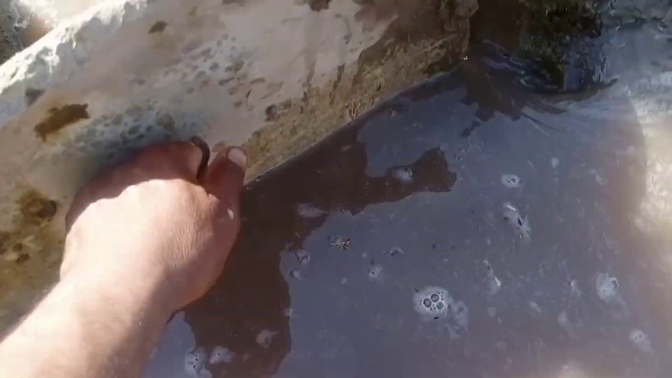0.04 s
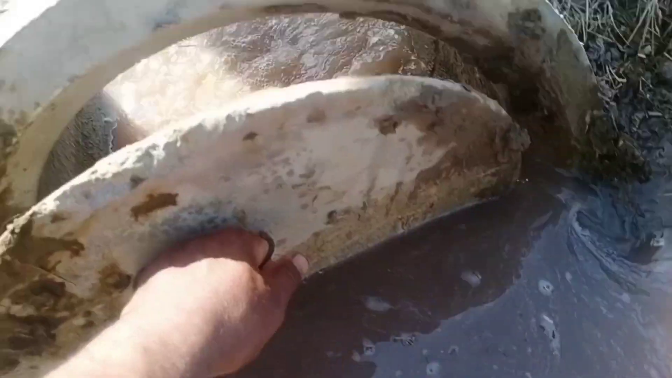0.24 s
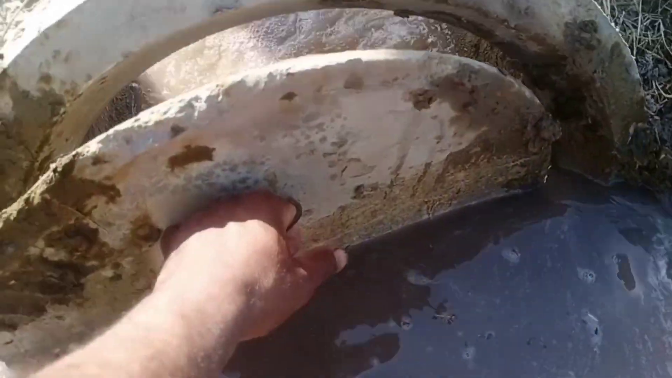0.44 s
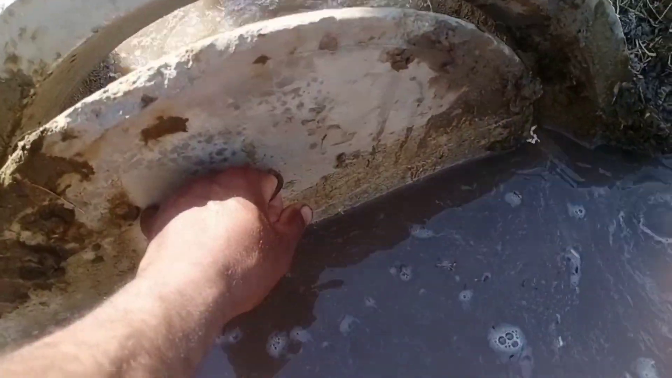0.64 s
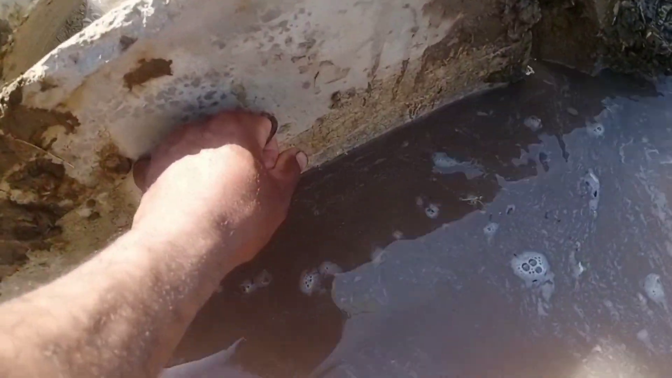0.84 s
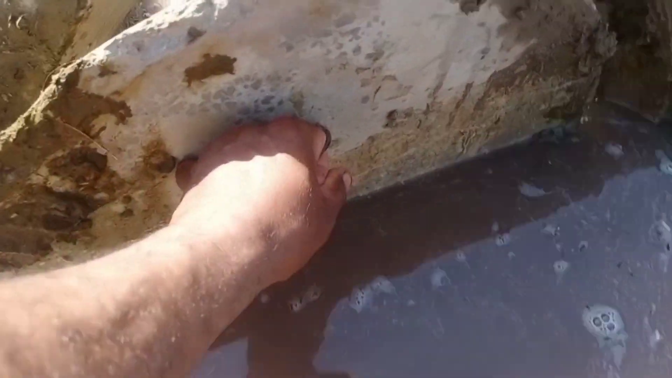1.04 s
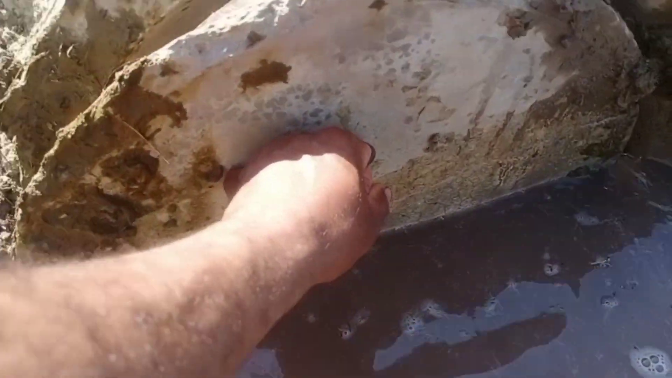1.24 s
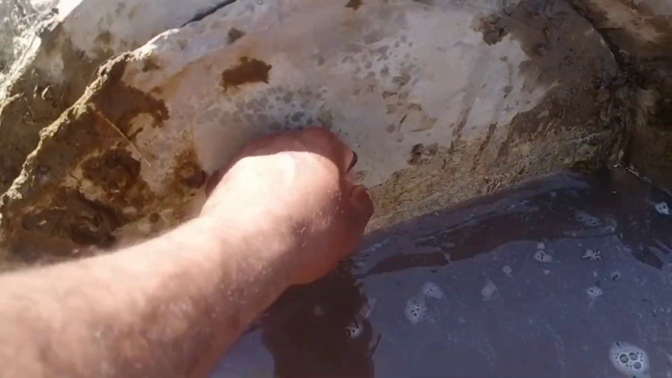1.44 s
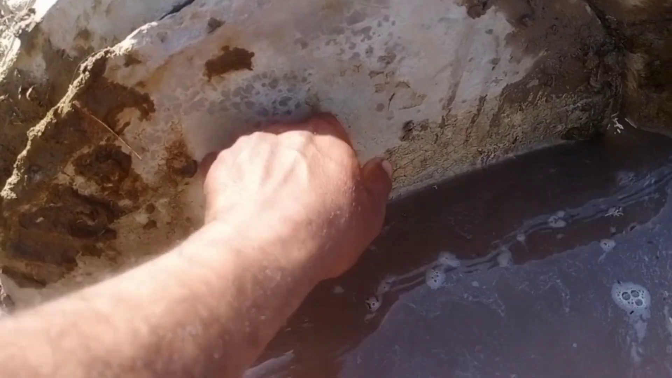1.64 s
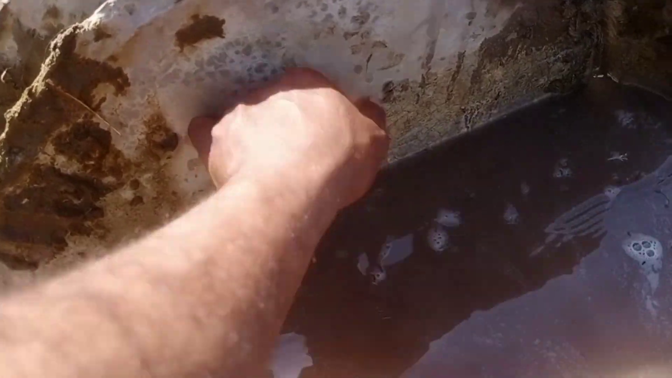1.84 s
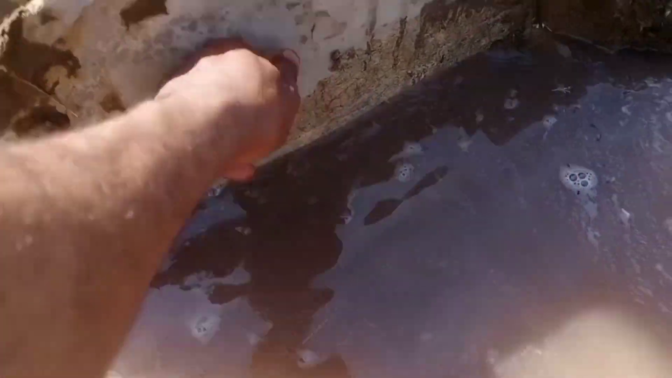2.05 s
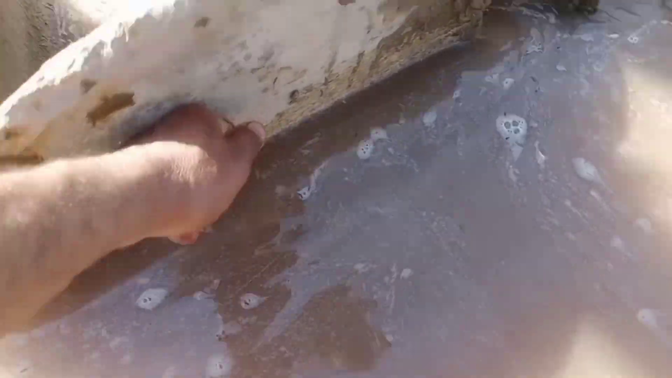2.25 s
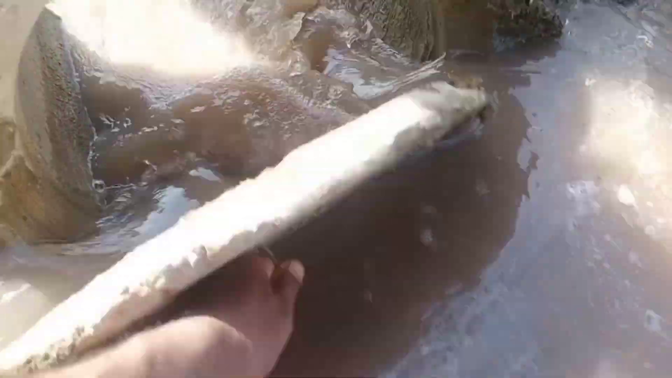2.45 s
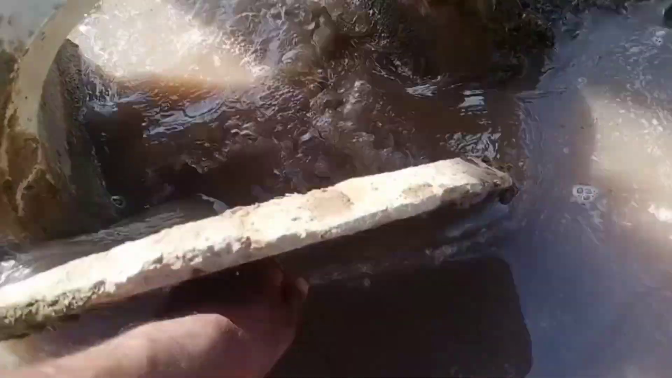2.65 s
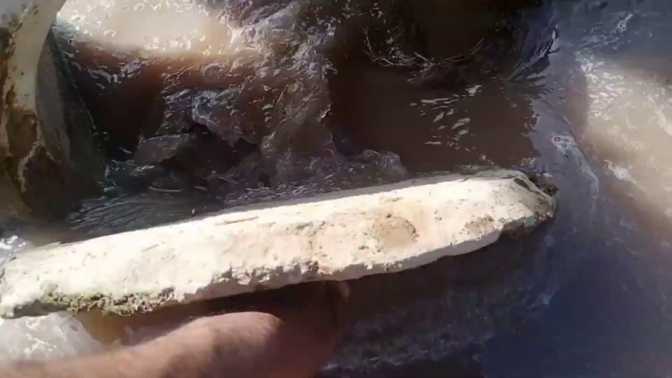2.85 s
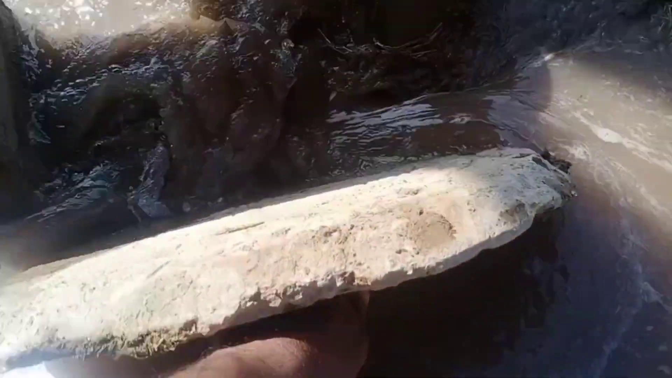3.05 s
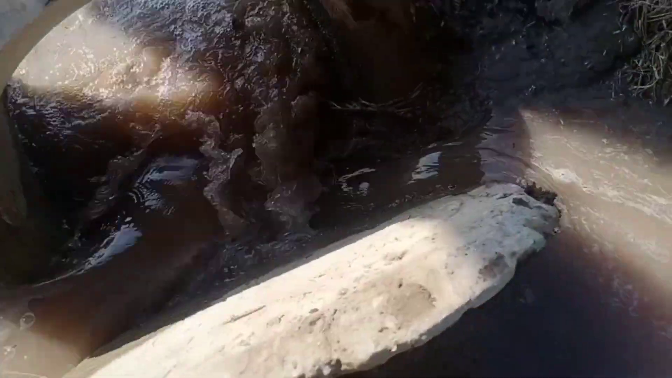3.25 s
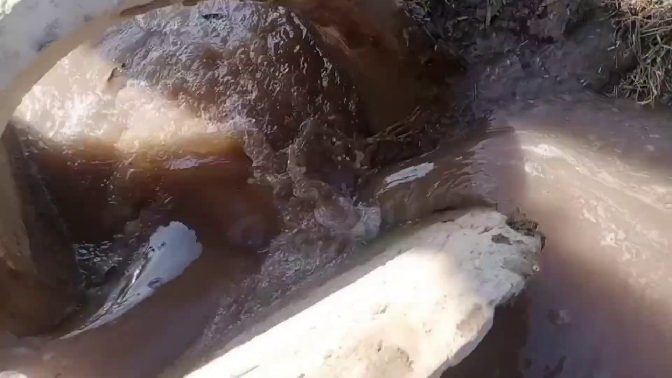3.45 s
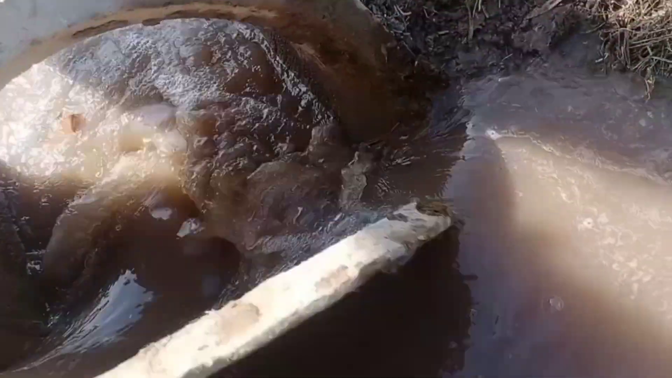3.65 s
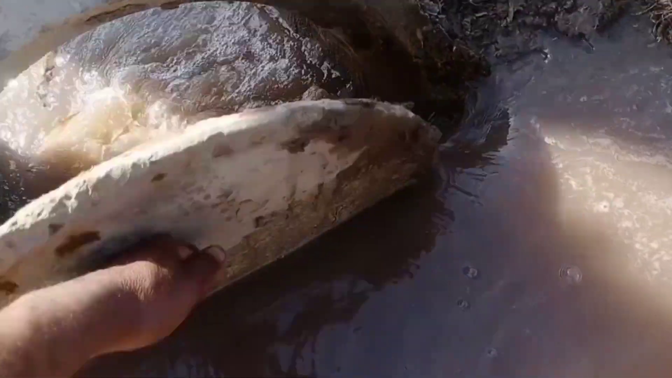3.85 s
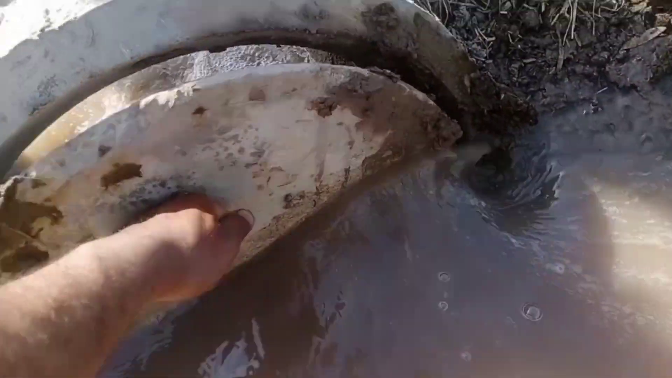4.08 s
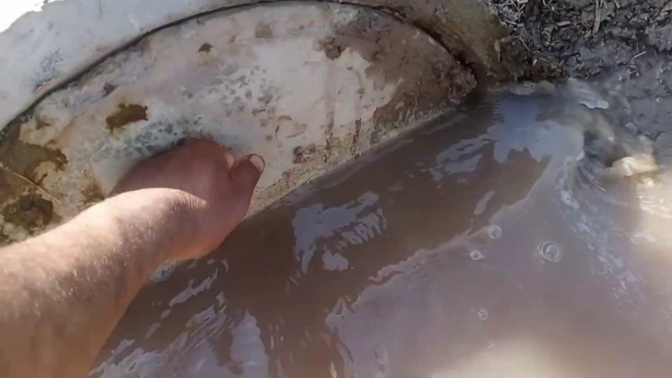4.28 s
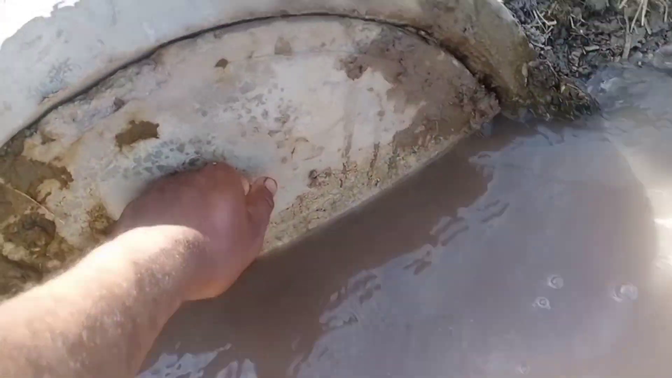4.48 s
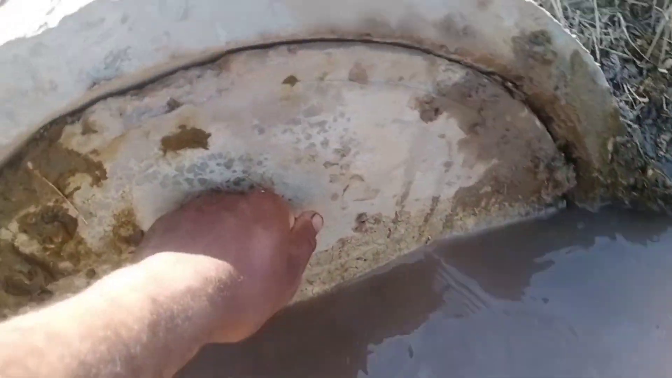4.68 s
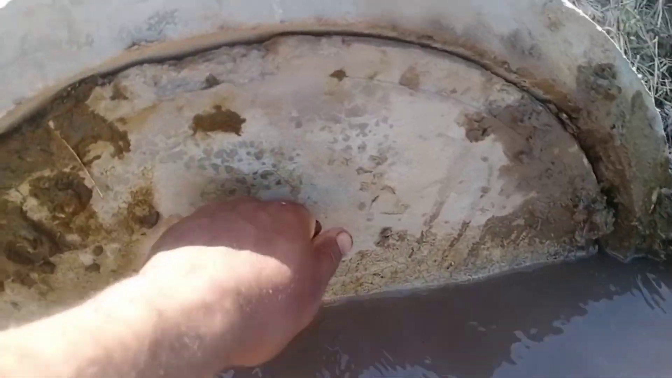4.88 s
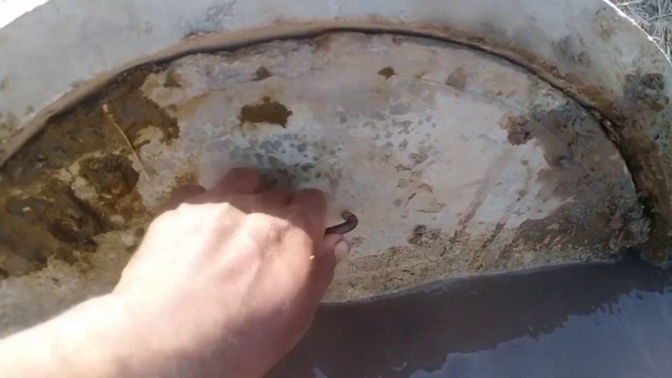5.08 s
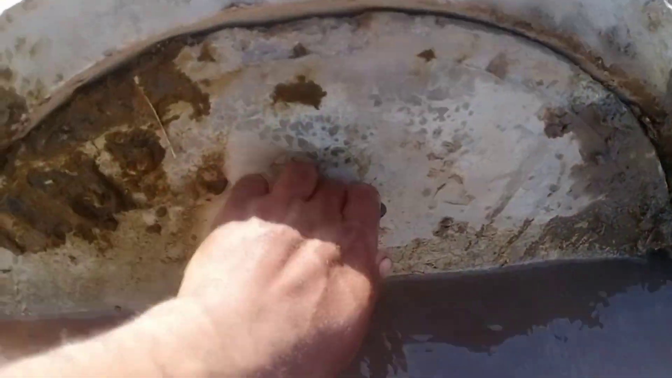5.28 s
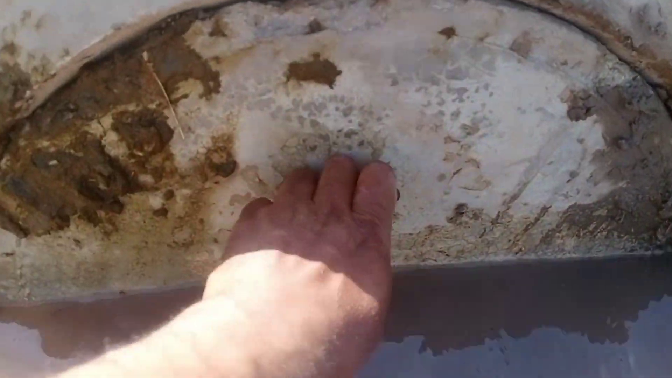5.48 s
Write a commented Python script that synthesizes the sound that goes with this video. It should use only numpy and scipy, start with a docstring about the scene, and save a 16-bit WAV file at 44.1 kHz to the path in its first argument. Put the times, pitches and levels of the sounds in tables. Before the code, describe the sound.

Close outdoor sound beside a canal: water burbles and spatters past a concrete plate at a pipe mouth. Dull bumps nearly stop it, then it bursts into a full, splashing gush. A rapid run of heavy knocks and gritty scraping seats the plate, leaving a thin hollow trickle. A small bird repeats a quick twitter with a high whistle at the start and again later.

```python
"""Beside a canal, water pours from a concrete pipe round a gate plate held by hand: bubbles, wash and drops.
A small bird repeats one quick phrase nearby, in gliding notes with a faint echo; ringing bubbles and slaps
stand out of the flow, and wavering low tones make air glug in the pipe. The plate bumps the rim as a sagging
throb with grit and ringing, is pulled away so that the water gushes in a fuller colour, then knocks back
into place and leaves a thin seep, with the shut pipe ringing softly."""
import sys
import numpy as np
from scipy import signal
from scipy.fft import rfft, irfft, next_fast_len
from scipy.io import wavfile
from scipy.ndimage import uniform_filter1d

SR = 44100
rng = np.random.default_rng(int(sys.argv[2]) if len(sys.argv) > 2 else 0)


def pcm_store(signal):
    """Save signal as 16-bit PCM."""
    levels = np.round(np.clip(np.atleast_2d(signal), -1, 1) * 32767)
    wavfile.write(sys.argv[1], SR, levels.astype(np.int16).T)


N = 243387
TIME = np.arange(N) / SR
SIZE = next_fast_len(N, real=True)
BINS = np.fft.rfftfreq(SIZE, 1 / SR)

# strength of the flow, before each layer's own trim: start_s, level_db
FLOW = [(0, -26.5), (1.15, -29.5), (1.45, -29.5), (1.66, -34), (1.8, -43.5), (1.96, -39), (2.06, -31),
        (2.2, -30), (2.5, -21), (2.55, -25.5), (2.58, -26), (2.635, -21), (2.66, -18), (2.92, -17),
        (3.02, -21.5), (3.15, -19), (3.38, -17), (3.54, -21), (4.22, -24), (4.29, -32), (4.34, -43.5),
        (4.55, -48), (4.98, -43.5), (5.3, -54), (5.52, -70)]
# position of the gate plate: start_s, opening (0 seated, 1 tilted ajar, 2 eased off the rim, 3 pulled away)
GATE = [(0, 1), (1.5, 1), (1.72, 2), (2.45, 2), (2.62, 3), (4.2, 3), (4.29, 2), (4.33, 0), (5.52, 0)]
# ring of the rim and plate: pitch_hz (roughly, each knock shifts it), level_db, t60_s (time to fall 60 dB)
RIM = [(293.6, 0.5, 0.044), (437, -1, 0.074), (640, -6.5, 0.039), (980, -7, 0.034)]


def amp(db):
    """Turns decibels into gain."""
    return 10 ** (np.asarray(db) / 20)


def unit(x):
    """Scales a sound to an rms of 1."""
    return x / np.sqrt(np.mean(x ** 2) + 1e-20)


def curve(rows, axis=1):
    """Reads one column of a control table at every sample."""
    rows = np.asarray(rows, float)
    return np.interp(TIME, rows[:, 0], rows[:, axis])


def add(mix, s, sound):
    """Mixes a sound in at time s, cutting off what falls outside."""
    at = round(s * SR)
    sound = sound[max(-at, 0):]
    part = mix[max(at, 0):][:len(sound)]
    part += sound[:len(part)]


def band(x, low_hz, high_hz, order=2):
    """Keeps only the sound between two frequencies."""
    edges = [low_hz, min(high_hz, .47 * SR)]
    return signal.sosfilt(signal.butter(order, edges, "band", fs=SR, output="sos"), x)


def coloured(x, points, modes=(), size=2400):
    """Gives a sound a broad spectrum (Hz, dB); a cavity gathers nearby energy into its modes (Hz, width, dB)."""
    hz, db = np.transpose(points)
    ringing = sum(amp(peak_db) ** 2 / (1 + (2 * (BINS - centre) / width) ** 2)
                  for centre, width, peak_db in modes)
    z = rfft(x, SIZE) * np.sqrt(1 + ringing)
    # flatten the broad spectrum first, leaving fine detail, then apply the wanted colour
    z /= np.sqrt(abs(uniform_filter1d(abs(z) ** 2, size)) + 1e-12)
    return irfft(z * amp(np.interp(np.log(BINS + 1), np.log(hz), db)))[:N]


def wander(rate_hz):
    """Makes slow random motion, rms about 1, without wild excursions."""
    knots = rng.standard_normal(2000)
    path = np.interp(TIME * 2 * rate_hz, np.arange(len(knots)), knots)
    return np.clip(unit(path), -2, 2)


def patchy(x, db, rate_hz, count=6):
    """Lets each band of the treble flicker on its own, as splashes of different sizes come and go."""
    z = rfft(x, SIZE)
    # overlapping bands spaced from 2 to 12 kHz; the end bands take in everything beyond
    place = np.interp(np.log(BINS + 1), np.log([2000, 12000]), [0, count - 1])
    out = np.zeros(N)
    for k in range(count):
        slice_of_sound = irfft(z * np.maximum(1 - abs(place - k), 0))[:N]
        out += slice_of_sound * amp(db * wander(rate_hz))
    return out


def impacts(per_s, spread_db):
    """Scatters random clicks, many small and a few large."""
    size = amp(spread_db * np.minimum(rng.exponential(1, N), 4))
    return size * rng.choice([-1, 1], N) * (rng.random(N) < per_s / SR)


def babble(spread_db=4.0, cycles=3.03, glide=0.022, count=14000):
    """Sums a cloud of small bubbles, each a short ring at its own pitch; the smallest die soonest."""
    when, pitch, loud, ring, rise = rng.random((count, 5)).T
    hz = 260 * 28 ** (pitch ** .65)
    decay = np.minimum(cycles * (.5 + ring) / hz, .006)
    size = np.sqrt(hz) * amp(spread_db * np.minimum(-np.log(loud), 4))
    # lay all bubbles end to end: k is the bubble, age its samples since birth
    length = (6 * decay * SR).astype(int)
    k = np.repeat(np.arange(count), length)
    age = np.arange(len(k)) - (np.cumsum(length) - length)[k]
    u = age / (decay * SR)[k]
    tone = np.sin(2 * np.pi * hz[k] * age / SR * (1 + glide * rise[k] * u / 2))
    rings = size[k] * u * np.exp(-u) * tone
    # then drop each one at its random start
    return unit(np.bincount((when * N).astype(int)[k] + age, rings, N)[:N])


def water(level_db=-3, gurgle_db=0.0, seep_wash_db=-9, spill_wash_db=-9, swirl_wash_db=-9, gush_wash_db=-10,
          fizz_db=-14.0, surge_db=1.32, crackle_db=8, burst_db=7):
    """Mixes bubbles, wash and fizzing drops; the opening turns a thin seep into a spill, a swirl, then a gush."""
    # colour of the water at each opening: pitch_hz, level_db
    seep, spill = [(40, -56), (300, -33), (560, -15), (850, -12.5), (1150, -6.5), (1600, -11), (2000, -3),
                   (2700, 0.5), (4300, 2), (6600, -0.5), (7600, -9), (9500, -33), (12000, -51)], [(35, -84), (60, -22.5), (177, -20), (330, -11), (499, -27), (579, -5),
                                 (658, -14), (813, 3), (1170, -3.5), (1300, -1.5), (1900, -2), (3820, -14),
                                 (4160, -15), (5710, -16), (6770, -20), (9500, -44), (12400, -74),
                                 (20900, -120)]
    swirl, gush = [(40, -46.5), (100, -10.5), (200, -23), (330, -10), (520, -43), (780, -5.5), (1060, -1),
                   (1500, -3), (2000, -2.5), (3500, -7.5), (6000, -19.5), (7200, -22), (9000, -40),
                   (11000, -48.5)], [(35, -65), (60, -29.5), (140, -30.5), (197, -2), (288, -11.5), (341, -14),
                                  (431, -20.5), (521, -6), (672, -10), (1170, 2.5), (1540, -7.5),
                                  (2070, -2.5), (2350, -7), (5840, -14), (9500, -41), (12400, -46.5),
                                  (20900, -120)]
    # hollows between plate and pipe: pitch_hz, width_hz, level_db (over the direct sound)
    seep_hollow, spill_hollow = [(900, 70, 9), (1270, 40, 6), (2020, 60, 7), (2400, 70, 5), (2690, 90, 6)], [(590, 21, 12.7), (753, 49, 14.8), (940, 76, 5),
                                                      (1376, 18, 8.4), (1574, 87, 2), (2560, 170, 24)]
    swirl_hollow, gush_hollow = [(290, 42, 11), (1055, 130, 21), (1345, 110, 13.5), (1900, 56, -2),
                                 (2590, 190, 21.5)], [(443, 9.9, 9), (1164, 180, -1), (1805, 150, 16.5),
                                                       (2265, 89, -22.5)]
    opening = np.clip(curve(GATE), 0, 3)
    # longer-ringing bubbles come in clumps
    gurgle = babble(spread_db=2.1, cycles=9, glide=0.022, count=3200) * amp(2 * wander(20))
    bubbles = unit(babble() + amp(gurgle_db) * gurgle)
    wash = patchy(rng.standard_normal(N) + .7 * unit(impacts(900, 4)), 2.5, 30)
    fine_drops = band(rng.standard_normal(N) + .6 * unit(impacts(900, 4)), 4000, 10000)
    fizz = patchy(fine_drops, crackle_db, 76) * amp(fizz_db + burst_db * wander(55))
    streams = [(seep, seep_hollow, seep_wash_db), (spill, spill_hollow, spill_wash_db),
               (swirl, swirl_hollow, swirl_wash_db), (gush, gush_hollow, gush_wash_db)]
    out = np.zeros(N)
    for step, (colour, modes, wash_db) in enumerate(streams):
        stream = coloured(.5 * bubbles + amp(wash_db) * wash + fizz, colour, modes)
        stream /= band(stream, 700, 3500).std()  # match the streams in their babbling range
        out += stream * np.maximum(1 - abs(opening - step), 0)  # crossfade by opening
    return out * amp(curve(FLOW) + level_db + surge_db * wander(35))


def trickle(level_db=-5, loudest_flow_db=-38):
    """Lets single small bubbles stand out of a weak flow; their level stops growing in a strong one."""
    plinks = band(babble(spread_db=2.5, cycles=7, glide=.03, count=420), 1200, 5000)
    return unit(plinks) * amp(np.minimum(curve(FLOW), loudest_flow_db) + level_db)


def spray(mist_db=-17.5, flicker_db=4.0, shielded_db=-5):
    """Ticks tiny drops on the concrete, each scattering for a moment; the faster the flow, the louder."""
    # colour of the spray: pitch_hz, level_db
    spray_colour = [(3500, -22), (5800, 18), (7000, 7), (8000, -0.5), (9300, -17), (11000, -13.5),
                    (12500, -7.5), (15500, -5.5)]
    full_flow_db = -18
    # spray rises gently with the flow, then steeply once the water breaks up:
    # dB at full flow (before shield and flicker), dB per dB of flow, ticks per second, spread of sizes in dB
    kinds = ((-51, 0.11, 330, 5.5), (-34, 2, 1200, 4.8))
    t = np.arange(SR // 100) / SR
    scatter = rng.standard_normal(len(t)) * np.exp(-t / 0.005)
    over_db = curve(FLOW) - full_flow_db
    out = np.zeros(N)
    for db, slope, per_s, spread_db in kinds:
        ticks = unit(signal.oaconvolve(impacts(per_s, spread_db), scatter)[:N])
        ticks = ticks + amp(mist_db) * rng.standard_normal(N)
        out += unit(coloured(ticks, spray_colour)) * amp(db + slope * over_db)
    # the plate, eased off the rim, hides the spray
    shield_db = shielded_db * np.maximum(1 - abs(curve(GATE) - 2), 0)
    return patchy(out, 2.5, 30) * amp(shield_db + flicker_db * wander(27))


def leak(level_db=-47, flicker_db=4.0, spits_per_s=700, spread_db=4.0):
    """Hisses and spits as thin jets past the rim, fading when the plate is pressed tight near the end."""
    # colour of the jets: pitch_hz, level_db
    leak_colour = [(1500, -31.5), (3000, -12.5), (4200, 0.5), (5200, -0.5), (6600, -13), (9000, -52)]
    pressed_db = np.interp(TIME, [5.2, 5.42], [0, -12])
    spits = unit(impacts(spits_per_s, spread_db))
    jets = unit(coloured(spits + .5 * rng.standard_normal(N), leak_colour))
    return jets * amp(level_db + pressed_db + flicker_db * wander(20))


def air(level_db=-64):
    """Shapes steady noise into a faint outdoor background."""
    # colour of open air by the canal: pitch_hz, level_db
    air_colour = [(30, -19.5), (60, -8.5), (130, 1), (220, -9.5), (330, -9), (500, -14), (1000, -18.5),
                  (4000, -8), (9000, -50.5), (15000, -40)]
    return amp(level_db) * unit(coloured(rng.standard_normal(N), air_colour))


def note(length, first_hz, held_hz, last_hz, crescendo=1.2, quaver=.008):
    """Sings one bird note that grows louder and quavers slightly, then flicks in pitch as it stops."""
    hook_s = .004  # the closing flick
    t = np.arange(int(length * SR)) / SR
    turn = length - hook_s
    waver = np.interp(t, np.arange(40) * hook_s / 2, rng.standard_normal(40))
    flick = (last_hz - held_hz) * np.clip((t - turn) / hook_s, 0, 1) ** 1.3
    glide = np.interp(t, [0, turn], [first_hz, held_hz])
    hz = (glide + flick) * (1 + quaver * waver + rng.uniform(-.014, .014))
    fade = np.sin(np.pi / 2 * np.minimum((length - t) / (.7 * hook_s), 1))
    swell = (t / length) ** abs(crescendo) * fade
    return swell / swell.max() * np.sin(2 * np.pi * np.cumsum(hz) / SR)


def glanced(x, share=0.22):
    """Adds a second path that glances off the water 2 to 6 ms later and ripples the note."""
    late = np.zeros(int(rng.uniform(.002, .006) * SR))
    return np.r_[x, late] + share * np.r_[late, x]


def bird(echo_db=-33, echo_t60=0.12, uneven_db=2):
    """Sings twitter and high whistle; the direct sound is shaded at times, the echo off the banks stays even."""
    # notes of one phrase, pitch and level varied a little:
    # start_s (after the phrase starts, timing slips a little), length_s, first_hz, held_hz, last_hz, level_db
    twitter = [(0, 0.017, 4220, 4100, 4070, -6.5), (0.024, 0.0085, 4250, 4300, 3680, -3.5),
               (0.047, 0.0042, 3720, 3970, 3850, -1), (0.053, 0.024, 5050, 5100, 4480, -6),
               (.077, .008, 5350, 5200, 4470, 0.5), (.087, 0.016, 5395, 5393, 4510, 1),
               (0.105, 0.012, 3880, 4040, 4020, -8), (0.116, 0.018, 4590, 4440, 4150, 0.5),
               (0.135, 0.0044, 4950, 4730, 4156, 0)]
    # phrases: start_s, twitter_db, whistle_db, whistle_last_hz (roughly)
    phrases = [(-.001, -21.5, -24.5, 6530), (0.298, -24.5, -30.5, 6564), (0.599, -23, -24.5, 6560),
               (0.917, -23.5, -31, 6450), (3.466, -19.5, -17, 6540), (3.778, -19.5, -14.5, 6730),
               (4.079, -17.5, -20.5, 6630), (4.39, -18, -16.5, 6460), (4.701, -20, -27.5, 6550),
               (5.019, -21.5, -31.5, 6440), (5.332, -24.5, -35, 6500)]
    slip_s, whistle_delay_s, whistle_s = .0015, .153, .037
    direct, sung = np.zeros((2, N))
    for s, twitter_db, whistle_db, end_hz in phrases:
        for after, length, first, middle, last, db in twitter:
            gain = amp(db + rng.uniform(-uneven_db, uneven_db))
            chip = gain * glanced(note(length, first, middle, last, crescendo=0.88))
            start = s + after + rng.uniform(-slip_s, slip_s)
            add(direct, start, amp(twitter_db) * chip)
            add(sung, start, chip)
        whistle = note(whistle_s, 6670, end_hz, end_hz, crescendo=0.46, quaver=.004)
        add(direct, s + whistle_delay_s, amp(whistle_db) * whistle)
        add(sung, s + whistle_delay_s, whistle)
    t = np.arange(SR // 3) / SR
    banks = rng.standard_normal(len(t)) * amp(-60 * t / echo_t60) * (t > .004)
    echo = signal.oaconvolve(sung, banks / np.linalg.norm(banks))[:N]
    return direct + amp(echo_db) * echo


def bubble(hz, decay, octaves_per_s):
    """Rings a pocket of air that swells and dies, its pitch gliding as it nears the surface."""
    t = np.arange(0, decay * 6, 1 / SR)
    swell = (1 - np.exp(-t / (.3 * decay))) * np.exp(-t / decay)
    return swell / swell.max() * np.sin(2 * np.pi * np.cumsum(hz * 2 ** (octaves_per_s * t)) / SR)


def splashes(slap_db=0., bubble_db=-7.5, width=1.37):
    """Bursts noise for slaps of water and rings the large bubbles that they trap."""
    # slaps of water on plate and rim: start_s, level_db (before swell and filter), decay_s
    slaps = [(.09, -14, 0.0038), (.198, -20, 0.0054), (.577, -16, .004), (0.89, -18.5, .008),
             (1.273, -18, 0.0058), (1.295, -16.5, 0.0061), (1.432, -14.5, 0.0025), (1.547, -16, .005),
             (1.639, -12.5, 0.0032), (1.993, -15, 0.0035), (2.033, -26.5, .008), (2.067, -16, .003),
             (2.189, -14, 0.0078), (2.248, -14, 0.0033), (2.379, -15, .004), (2.558, -13.5, 0.019),
             (2.65, -12, 0.005), (2.672, -5.5, .003), (2.845, -13, .004), (3.033, -20, .012),
             (3.297, -13.5, 0.038), (3.381, -9.5, .012), (3.827, -1, 0.0045), (3.968, -21, 0.031),
             (4.145, -2.5, 0.0042), (4.22, -15.5, 0.01), (5.25, -32.5, 0.0027), (5.31, -45, 0.0034)]
    # the loudest bubbles: start_s, level_db (before bubble_db), pitch_hz (at the start)
    loud_bubbles = [(.004, -10.5, 1450), (.248, -16, 1240), (.398, -16.5, 879), (0.577, -15.5, 1910),
                    (.682, -13, 2680), (.749, -16, 1124), (.846, -18, 1910), (0.885, -8, 2250),
                    (.893, -15, 2530), (1.031, -23, 2030), (1.098, -17, 2020), (1.137, -16, 1960),
                    (1.275, -12.5, 1465), (1.407, -6, 2550), (1.416, -7.5, 1710), (1.295, -19, 953),
                    (1.55, -20, 1350), (1.641, -9.5, 2005), (1.845, -26, 980), (2.096, -19.5, 990),
                    (2.201, -7, 2880), (2.232, -4.5, 1660), (2.248, -8.5, 3500), (2.274, -9.5, 2300),
                    (2.575, -3, 1130), (2.595, -12, 1044), (2.644, -8.5, 1130), (2.714, -6.5, 1140),
                    (2.81, -6, 1080), (2.846, -6, 2030), (2.881, -2.5, 2070), (2.926, -3, 2110),
                    (2.966, -5, 1290), (3.154, -2.5, 2640), (3.2, 1.5, 2900), (3.247, -3.5, 1187),
                    (3.532, -15, 1630), (3.583, -6.5, 1230), (3.629, -8, 1164), (3.696, -10.5, 1804),
                    (3.723, -5.5, 3130), (3.751, -13, 980), (4.023, -6, 1286), (4.063, 2.5, 1143),
                    (4.363, -20, 3310), (4.429, -22, 2800), (4.924, -36, 753), (4.974, -35.5, 793),
                    (5.063, -32.5, 1287), (5.249, -22, 2100), (5.299, -31, 2880), (5.311, -21, 2315),
                    (5.455, -37, 1336)]
    slap_hz = 2020
    # every bubble fades over about as many cycles and rises as it nears the surface
    ring_cycles, rise_octaves_per_s = 6.2, 2.1
    out, t = np.zeros(N), np.arange(SR // 6) / SR
    for s, db, decay in slaps:
        burst = unit(band(rng.standard_normal(len(t)), slap_hz / width, slap_hz * width, order=1))
        shape = (1 - np.exp(-t / 0.0023)) * np.exp(-t / decay)
        add(out, s, amp(db + slap_db) * band(burst, 330, 2600) * shape)
    for s, db, hz in loud_bubbles:
        add(out, s, amp(db + bubble_db) * bubble(hz, ring_cycles / hz, rise_octaves_per_s))
    return out


def pipe(x, open_db=-11, shut_db=-1, t60=0.18):
    """Throws splashes back from the concrete bore as a short hollow tail, strongest once it is shut."""
    t = np.arange(SR // 3) / SR
    tail = band(rng.standard_normal(len(t)), 420, 4000) * amp(-60 * t / t60) * (t > .005)
    wet = amp(np.interp(curve(GATE), [0, 1], [shut_db, open_db]))
    return x + signal.oaconvolve(x * wet, tail / abs(rfft(tail)).max() * 2)[:N]


def glugs(level_db=0., flutter_hz=20, flutter_share=0.054, churn=0.6):
    """Booms and gurgles unevenly as trapped air, gliding as its pocket shrinks or grows."""
    # pockets of air in the pipe and under the plate: start_s, length_s, first_hz, last_hz, level_db
    pockets = [(0.021, 0.27, 192, 206, -51), (0.089, 0.095, 570, 595, -39), (0.242, 0.076, 606, 597, -37.5),
               (0.284, 0.067, 199, 180, -37), (0.344, 0.12, 189, 176, -39.5), (0.399, 0.024, 898, 945, -24),
               (0.582, 0.095, 594, 618, -38), (0.605, 0.11, 182, 169.5, -42), (0.769, 0.12, 179, 180, -45),
               (1.013, 0.063, 189, 188, -49), (1.865, 0.071, 350, 314, -57), (1.948, 0.3, 1100, 1020, -56),
               (2, 0.14, 322, 364, -55), (2.154, 0.054, 423, 340, -49), (2.181, 0.14, 1031, 1104, -30),
               (2.278, 0.076, 589, 553, -40.5), (2.353, 0.066, 446, 440, -37.5),
               (2.412, 0.083, 354, 310, -46), (2.488, 0.031, 274, 269, -37.5),
               (2.563, 0.026, 466, 450, -20), (2.657, 0.055, 235, 258, -33.5),
               (2.659, 0.036, 170, 160, -44), (2.79, 0.048, 223, 205, -33.5),
               (2.797, 0.21, 2045, 2096, -28), (3.086, 0.0356, 207, 202, -27), (3.22, 0.077, 204, 214, -34),
               (3.32, 0.026, 325, 490, -26.5), (3.36, 0.02, 700, 880, -27), (3.399, 0.11, 210, 197, -31.5),
               (3.392, 0.054, 1144, 1223, -26), (3.493, 0.063, 215.4, 206, -31.5),
               (3.534, 0.12, 1170, 1117, -28.5), (3.906, 0.12, 1218, 1280, -29),
               (4.424, 0.09, 1050, 1150, -49.5), (4.541, 0.15, 934, 880, -51.5),
               (4.657, 0.086, 872, 823, -54), (4.604, 0.05, 2070, 2050, -48),
               (4.815, 0.11, 2040, 1920, -57), (4.892, 0.12, 2810, 2620, -48),
               (5.062, 0.14, 308, 294.4, -63)]
    out = np.zeros(N)
    for s, length, first_hz, last_hz, db in pockets:
        u = np.linspace(0, 1, int(length * SR))
        slow = signal.butter(2, flutter_hz + flutter_share * first_hz, fs=SR, output="sos")
        # two slow random motions make the tone waver in strength and phase
        a, b = unit(signal.sosfilt(slow, rng.standard_normal((2, SR))))[:, -len(u):]
        phase = 2 * np.pi * np.cumsum(first_hz * (last_hz / first_hz) ** u) / SR
        boom = (1 + churn * a) * np.sin(phase) + churn * b * np.cos(phase)
        shape = abs(np.sin(np.pi * u)) ** (2 / 3) * (1 - u / 2)
        add(out, s, amp(db + level_db) * unit(boom * shape))
    return out


def drops(low_hz=4500, high_hz=14000):
    """Lands a few heavier drops close by, each a sharp tick of noise."""
    # single drops that tick on the concrete: start_s, level_db (before the decay)
    ticks = [(.232, -41), (0.631, -39), (.776, -46), (.961, -42), (2.249, -42), (4.701, -48), (4.734, -52),
             (5.066, -43), (5.094, -38.5), (5.153, -63), (5.342, -38.5), (5.375, -48)]
    decay_s = 0.0012
    out, t = np.zeros(N), np.arange(SR // 30) / SR
    for s, db in ticks:
        tick = unit(band(rng.standard_normal(len(t)), low_hz, high_hz))
        add(out, s, amp(db) * tick * np.exp(-t / decay_s))
    return out


def throb(hz, swell, sag, steep, tail_db):
    """Swings water and air at a low pitch: the throb swells, sags in pitch and dies."""
    t = np.arange(SR // 4) / SR
    u = t / swell
    shape = (u * np.exp(1 - u)) ** steep + amp(tail_db) * (1 - np.exp(-u)) * np.exp(-t / 0.025)
    sagging_hz = hz * (1 + sag * (2 * np.exp(-u / 2) - 1))
    return shape * np.sin(2 * np.pi * np.cumsum(sagging_hz) / SR)


def plate(grit_db=-14.0, grit_decay=0.014, crunch_hz=640, crunch_decay=0.014):
    """Bumps and crunches the heavy plate on the pipe; the water damps its ring."""
    # dull knocks: start_s, level_db, pitch_hz (sags from 12 % above to 12 % below), swell_s,
    # rim_db (share of the rim's ring), crunch_db (share of crunching grit, halved below)
    knocks = [(1.247, -16, 147, 0.007, 7, -24), (1.302, -41, 140, .005, -17, -20),
              (1.352, -22, 140, 0.011, 0, -10), (1.432, -5, 143, 0.0041, -7.5, -5),
              (2.262, -35, 126, 0.0056, 11.5, -12), (2.56, -46.5, 120, .005, 26.5, 3),
              (2.727, -23.5, 148, 0.0067, 15, 16), (3.752, -2.5, 193, 0.0047, -2, -13),
              (3.828, -16.5, 169.4, 0.0083, -2, 2), (3.951, -22, 142, 0.01, 2.5, -9),
              (3.985, -8, 170.4, 0.0063, -2, -11), (4.066, -6, 142, 0.0055, -9, -9),
              (4.102, -9.5, 158, 0.0039, -14, -19.5), (4.15, -11.5, 131, 0.0057, 2.5, -3),
              (4.194, -3.5, 149, 0.008, -3, -31), (4.283, -30.5, 121, 0.015, -9, -25)]
    grains_per_s = 1500
    out, t = np.zeros(N), np.arange(SR // 4) / SR
    for s, db, hz, swell, rim_db, crunch_db in knocks:
        ring = np.zeros(len(t))
        for f, d, t60 in RIM:
            ring += amp(d - 60 * t / t60) * np.sin(2 * np.pi * f * rng.uniform(0.88, 1.04) * t)
        grit = unit(band(rng.standard_normal(len(t)), 65, 600))
        grit = amp(grit_db) * grit * np.exp(-t / grit_decay)
        grains = rng.standard_normal(len(t)) * (rng.random(len(t)) < grains_per_s / SR)
        crunch = unit(band(grains, crunch_hz / 1.4, crunch_hz * 1.4))
        crunch = amp(crunch_db) * crunch * np.exp(-t / crunch_decay)
        contact = (amp(rim_db) * ring + grit + .5 * crunch) * (1 - np.exp(-t / swell))
        add(out, s, amp(db) * (throb(hz, swell, sag=0.12, steep=2.77, tail_db=-17.5) + contact))
    return out


def scrapes(slips_per_s=700, spread_db=4):
    """Grinds the plate's edge along the rim: grains of concrete catch and slip as it slides."""
    # strokes of the plate's edge: start_s, length_s, level_db
    strokes = [(1.282, 0.046, -28.5), (1.438, 0.11, -36.5), (3.73, 0.097, -41), (3.966, 0.099, -28),
               (4.068, 0.13, -41)]
    # colour of the grinding: pitch_hz, level_db
    grind = [(40, -20.5), (130, 7), (300, -10.5), (600, -8.5), (950, -6), (1700, -5.5), (4000, -15.5),
             (7000, -42.5), (11000, -60.5)]
    out = np.zeros(N)
    rim_modes = [(hz, 50, 7) for hz, _, _ in RIM]
    grinding = coloured(impacts(slips_per_s, spread_db), grind, rim_modes)
    for s, length, db in strokes:
        stroke = grinding[int(s * SR):][:int(length * SR)]
        add(out, s, amp(db) * unit(stroke * signal.windows.tukey(len(stroke), .5)))
    return out


def murmur(level_db=-5, drips_per_s=90, detune=0.02, eased_share=0.28, count=3):
    """Rings the hollow pipe softly with drips, fully when it is shut and less when the plate is eased off."""
    # ring of the shut pipe: pitch_hz (each copy slightly detuned), level_db, t60_s (time to fall 60 dB)
    shut_pipe = [(403, -5, 0.07), (907, -4.5, 0.099), (1010, -4.5, 0.16), (1314, 5, 0.12), (1644, 4, 0.36),
                 (2080, 13, 0.22), (2430, 12, 0.31), (2720, 15.5, 0.088), (3140, -20, 0.099)]
    out, t = np.zeros(N), np.arange(SR // 3) / SR
    for hz, db, t60 in shut_pipe * count:
        tone = np.sin(2 * np.pi * hz * (1 + detune * rng.uniform(-1.05, 1)) * t)
        ring = amp(db - 60 * t / t60) * (1 - np.exp(-t / 0.0022)) * tone
        out += signal.oaconvolve(impacts(drips_per_s / count, 4.9), ring)[:N]
    covered = np.interp(curve(GATE), np.arange(4), [1, 0, eased_share, 0])
    return unit(out) * covered * amp(curve(FLOW) + level_db)


def heave(level_db=0., lump_db=3):
    """Heaves water under the plate in lumps of low noise as it is drawn off the rim."""
    # strength of the heaving, wandering by lump_db: start_s, level_db
    heave_levels = [(2.05, -66), (2.14, -59), (2.175, -32.5), (2.24, -39.5), (2.31, -38), (2.375, -38),
                    (2.45, -50), (2.62, -40.5), (2.66, -24.5), (2.75, -29.5), (2.83, -30)]
    # colour of the heaving: pitch_hz, level_db
    heave_colour = [(40, -22), (100, -11.5), (200, -15.5), (330, -8.5), (430, -0.5), (520, -1), (780, -0.5),
                    (1100, -19.5), (2500, -63)]
    # pocket under the plate: pitch_hz, width_hz, level_db (over the direct sound)
    heave_hollow = [(340, 30, 6.5), (432, 20, 13), (765, 40, 14)]
    swell_db = np.interp(TIME, *np.transpose(heave_levels), left=-120, right=-120)
    swell = amp(swell_db + level_db + lump_db * wander(16))
    return swell * unit(coloured(impacts(500, 3), heave_colour, heave_hollow))


def scene():
    """Mixes water, plate and bird, heard from just above the gate."""
    flow = water() + spray() + leak() + pipe(splashes() + trickle()) + glugs() + drops() + murmur() + heave()
    return (flow + air() + bird() + plate() + scrapes())[None]


def record(dry):
    """Sheds deep rumble and rounds the highest peaks, as the microphone does; then limits the treble."""
    lean = signal.sosfilt(signal.butter(3, 55, "high", fs=SR, output="sos"), dry)
    rounded = lean / (1 + (lean / .92) ** 6) ** (1 / 6)
    edge_hz = 15700
    lowpass = signal.firwin(511, edge_hz, window=("kaiser", 9), fs=SR)
    return signal.oaconvolve(rounded, lowpass[None], "same")


dry = scene()
out = record(dry)
pcm_store(out)
```